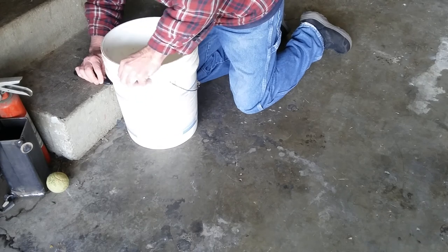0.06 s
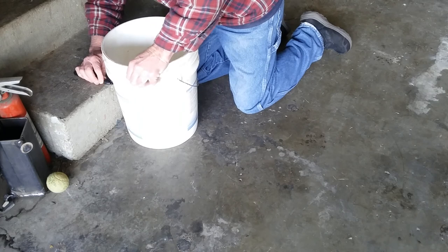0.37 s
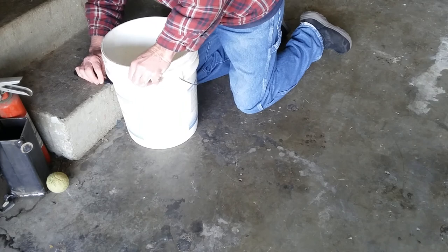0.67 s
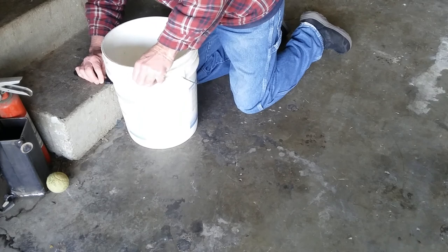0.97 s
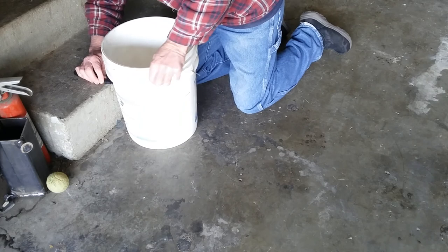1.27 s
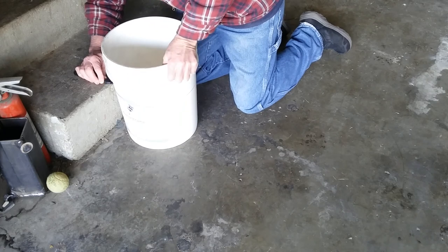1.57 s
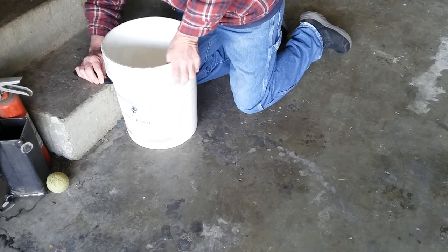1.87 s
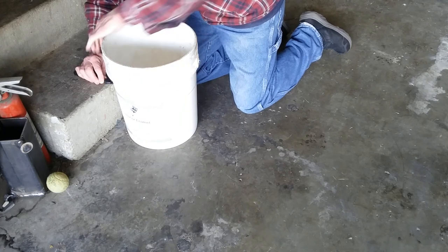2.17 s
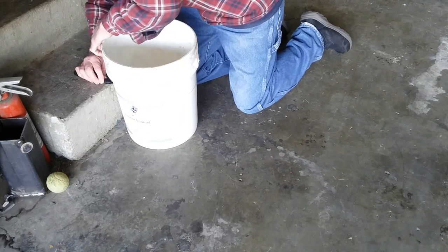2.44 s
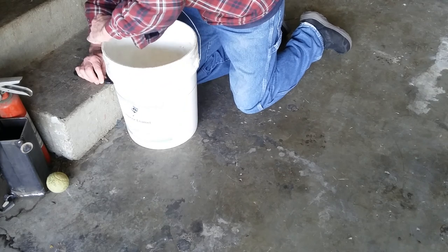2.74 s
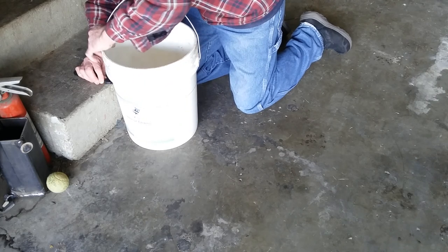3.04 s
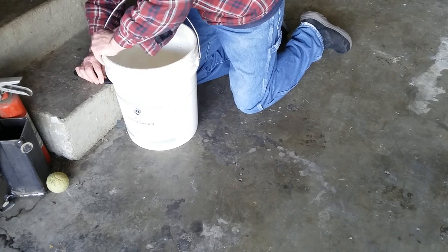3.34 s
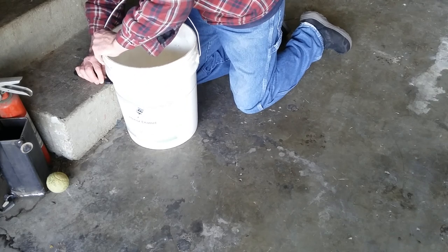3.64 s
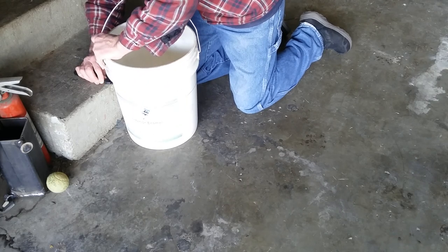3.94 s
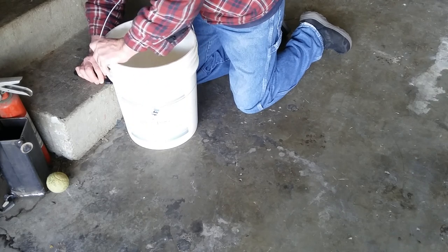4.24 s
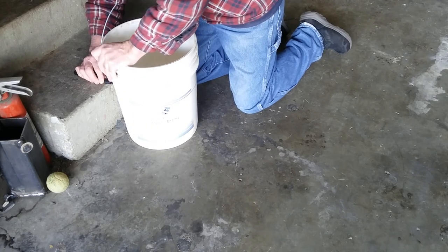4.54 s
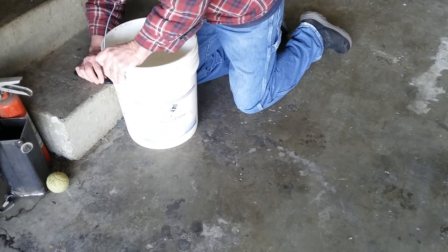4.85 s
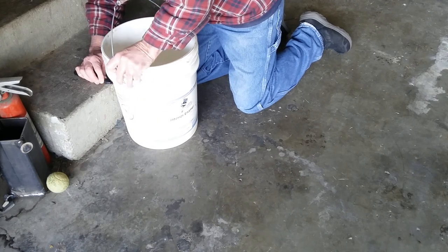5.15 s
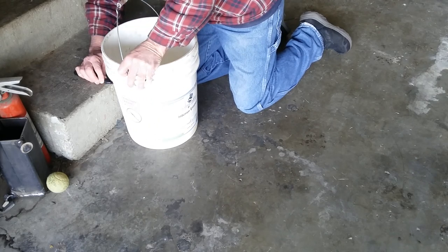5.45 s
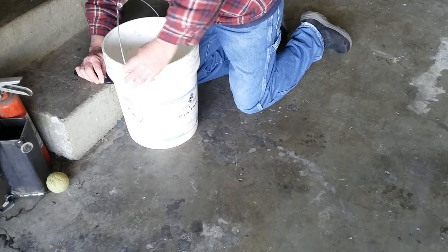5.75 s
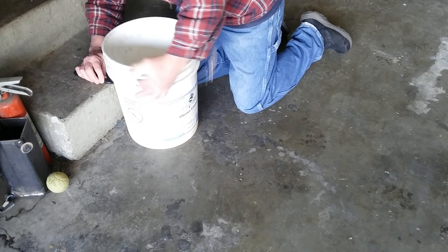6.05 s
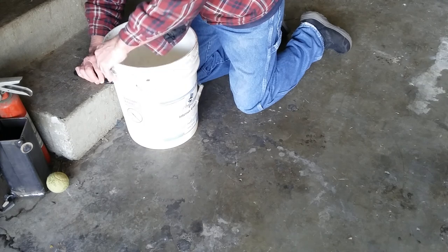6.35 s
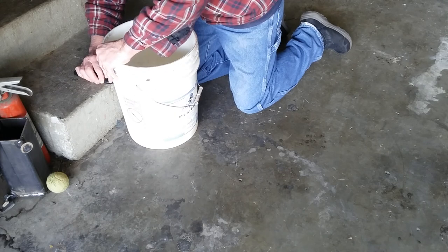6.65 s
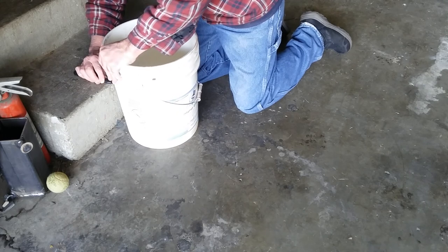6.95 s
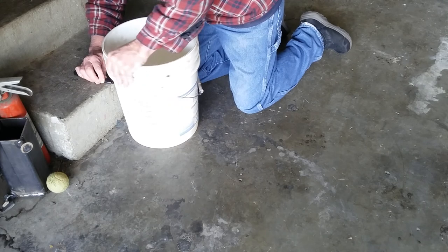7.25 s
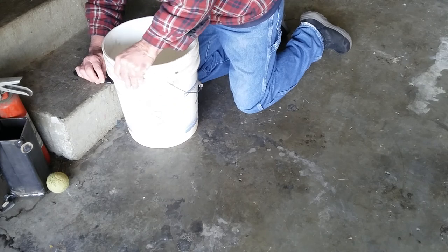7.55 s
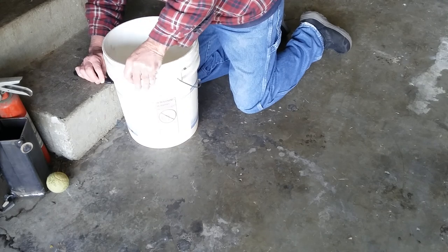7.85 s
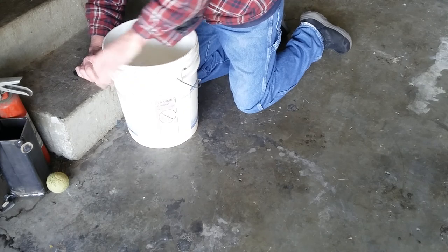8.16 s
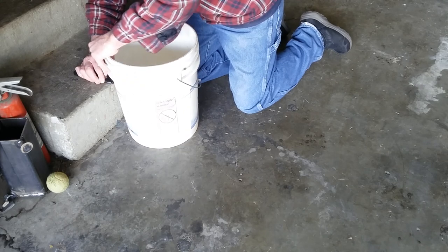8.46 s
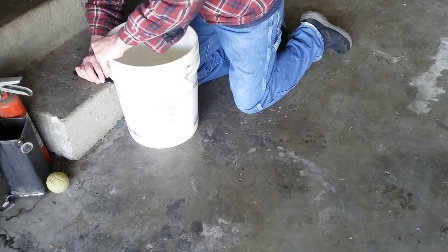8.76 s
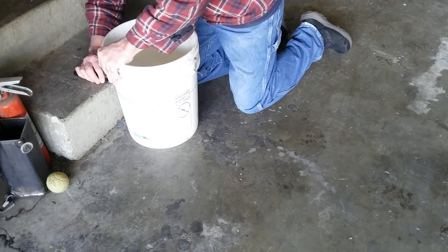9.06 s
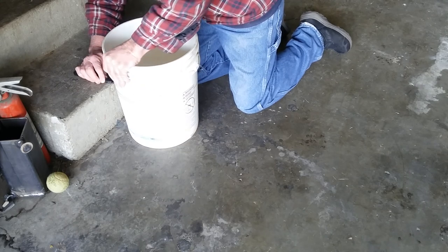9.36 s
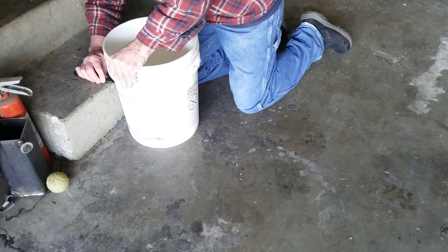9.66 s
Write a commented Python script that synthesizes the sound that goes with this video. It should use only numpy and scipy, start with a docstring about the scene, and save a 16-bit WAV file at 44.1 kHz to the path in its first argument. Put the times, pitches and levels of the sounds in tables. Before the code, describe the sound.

Hollow, rasping scrapes of a plastic bucket turned against a concrete step, interrupted by a loud, bouncing clatter of its wire handle.

```python
"""In a garage, a plastic bucket is turned by hand with its rim pressed against a concrete step.
First grit catches the rim in strokes, and the stick-slip friction rings the bucket's wall. From 2.3 s
the hand regrips: a sleeve brushes the rim and the wire handle clicks in its sockets. More strokes follow,
until at 6.2 s the handle swings over, slams on the wall and bounces. Then the scraping resumes, while
a far engine, droning faintly since the start, sinks in pitch."""
import sys
import numpy as np
from scipy import signal
from scipy.fft import rfft, irfft
from scipy.io import wavfile
from scipy.ndimage import uniform_filter1d

SR = 44100
rng = np.random.default_rng(int(sys.argv[2]) if len(sys.argv) > 2 else 0)


def transcribe(u):
    """Save the signal u as a 16-bit wav file named by the first command-line argument.

    u: samples, shape (n,) or (channels, n), limited to [-1, 1]; the rate is SR.
    q: integer samples, one column per channel.
    """
    v = np.clip(np.atleast_2d(u).T, -1, 1)
    q = np.round(v * 32767).astype(np.int16)
    wavfile.write(sys.argv[1], SR, q)


N = 433062
T = np.arange(N) / SR
RING_TIME = T[:SR * 3 // 4]
ROOM_T60_S = 0.5


def undb(db):
    """Decibels to amplitude ratio."""
    return 10 ** (np.asarray(db) / 20)


def unit(x):
    """Normalise to rms 1."""
    return x / np.sqrt(np.mean(x ** 2))


def unit_hit(x):
    """Normalise a blow so that its loudest 10 ms have rms 1."""
    return x / np.sqrt(uniform_filter1d(x ** 2, SR // 100).max())


def add(out, start_s, x):
    """Superposition: mix x into out from start_s on."""
    i = int(start_s * SR)
    out[i:i + len(x)] += x[:N - i]


def wander(hz):
    """Random modulation: glide between hz Gaussian values a second."""
    return np.interp(T * hz, np.arange(N // 100), rng.standard_normal(N // 100))


def colour(x, points, size=4096):
    """Minimum-phase filtering through (Hz, dB) points."""
    hz, db = np.transpose(points)
    gain = undb(np.interp(np.log(np.fft.rfftfreq(size, 1 / SR) + 1), np.log(hz), db))
    cepstrum = irfft(np.log(gain))
    cepstrum[1:size // 2] *= 2
    cepstrum[size // 2 + 1:] = 0
    return signal.fftconvolve(x, irfft(np.exp(rfft(cepstrum))))[:len(x)]


def split(x, low_hz=1090, high_hz=3870):
    """Crossover filtering into low, middle and high bands."""
    bands = (low_hz, "lowpass"), ([low_hz, high_hz], "bandpass"), (high_hz, "highpass")
    return [signal.sosfilt(signal.butter(4, hz, kind, fs=SR, output="sos"), x) for hz, kind in bands]


def decay(t60):
    """Exponential damping: 60 dB in t60 seconds."""
    return np.exp(-np.log(1000) * RING_TIME / t60)


def burst(t60):
    """Modal overlap: dense modes merge into decaying noise, here of unit energy."""
    x = rng.standard_normal(len(RING_TIME)) * decay(t60)
    return x / np.linalg.norm(x)


def modes(table, spread_db, detune=0.0013, build_cycles=0.89):
    """Modal superposition, unit energy: each contact favours other modes; low ones build up late."""
    hz, db, t60 = np.transpose(table)[:, :, None]
    amplitude = undb(db + spread_db * rng.standard_normal(hz.shape))
    cycles = hz * (1 + detune * rng.standard_normal(hz.shape)) * RING_TIME
    build = 1 - np.exp(-cycles / build_cycles)
    phase = 2 * np.pi * (cycles + rng.random(hz.shape))
    x = np.sum(amplitude * build * decay(t60) * np.sin(phase), axis=0)
    return x / np.linalg.norm(x)


# The far engine's note. Each row: time in seconds, pitch in Hz, level in dB.
ENGINE_NOTE = [(0, 97.6, -61.5), (.8, 94.6, -63.5), (2.2, 100, -71), (3.6, 98.4, -89), (4.4, 92, -61),
               (5.5, 89, -65.5), (6.2, 84, -51), (7.1, 81.4, -59.5), (7.599, 78.3, -58), (8, 66.8, -72),
               (9.8, 61.5, -70)]
def engine(waver_db=2):
    """Periodic firing gives a low tone that wavers in level."""
    times, hz, db = np.transpose(ENGINE_NOTE)
    phase = 2 * np.pi * np.cumsum(np.interp(T, times, hz)) / SR
    return unit(np.sin(phase)) * undb(np.interp(T, times, db) + waver_db * wander(12))


# Spectrum of the garage's still air. Each row: frequency in Hz, relative level in dB.
AIR_SPECTRUM = [(25, -31), (55, -6), (90, -3), (130, -7), (190, -5.5), (250, -18), (480, -17), (1200, -19),
                (2500, -27.5), (5500, -44), (10000, -41), (15500, -36.5)]
def air(level_db=-62):
    """Stationary noise, strongest in the bass, forms the ambient floor."""
    return undb(level_db) * unit(colour(rng.standard_normal(N), AIR_SPECTRUM))


# A sleeve's brush along the rim. Each row: time in seconds, level in dB.
SLEEVE_ENVELOPE = [(2.29, -100), (2.32, -66), (2.35, -63), (2.39, -70), (2.44, -83)]
# Spectrum of cloth on plastic. Each row: frequency in Hz, relative level in dB.
CLOTH_SPECTRUM = [(500, -29.5), (3000, -5.5), (5500, -9.5), (6600, 1), (8000, -5.5), (10500, -9.5),
                  (15000, -8.5)]
def sleeve(flutter_db=2.0):
    """Friction noise: fine threads slide over the plastic in a smooth swish."""
    times, db = np.transpose(SLEEVE_ENVELOPE)
    swish = unit(colour(rng.standard_normal(N), CLOTH_SPECTRUM))
    return swish * undb(np.interp(T, times, db) + flutter_db * wander(60))


# The wall flexes under hand and falling grip. Each row: start in seconds, relative level in dB.
WALL_THUMPS = [(0.503, -40), (0.84, -48), (1.436, -30), (3.101, -39), (3.149, -38.5), (5.958, -28),
               (5.977, -25), (6.074, -31), (6.463, -23)]
# Spectrum of a soft flex. Each row: frequency in Hz, relative level in dB.
FLEX_SPECTRUM = [(50, -33), (100, -4), (160, 4), (215, -2.5), (290, -1.5), (480, -9.5), (750, -24),
                 (2000, -53), (8000, -82)]
def thumps(push_t60=0.11, room_db=-4, gain_db=-7):
    """A soft contact lasts long, so it excites only the wall's low modes."""
    out = np.zeros(N)
    for start, db in WALL_THUMPS:
        push, room = (unit(colour(burst(t60), FLEX_SPECTRUM)) for t60 in (push_t60, ROOM_T60_S))
        add(out, start, undb(db + gain_db) * unit_hit(push + undb(room_db) * room))
    return out


# The bucket's modes. Each row: frequency in Hz, relative level in dB, 60 dB decay time in seconds.
BUCKET_MODES = [(122.1, -15.5, 0.84), (177.4, -8, 0.21), (250.5, -0.5, 0.28), (378, -6.5, .25),
                (495.8, -1, 0.22), (542, -8, 0.14), (648.5, -3, 0.29), (762, -0.5, 0.29), (949, -7.5, .31),
                (980, -7.5, .3), (1055, -6, 0.39), (1145, -9.5, 0.26), (1243, 0.5, 0.29), (1279, 1, 0.22),
                (1414, -19, 0.16), (1580, -3, 0.47), (1715, -12.5, .25), (1833, -8, 0.5),
                (1883, -9.5, 0.12), (2020, -11.5, 0.32), (2230, -17, 0.31), (2495, -5.5, 0.28),
                (2670, -14, .36), (3410, -12.5, 0.36), (3910, -16, .26), (4240, -18.5, 0.28)]
def bucket_ring(spread_db):
    """Impulse response: the bucket vibrates freely after one contact."""
    return modes(BUCKET_MODES, spread_db)


# The wall's drum note. Its row: frequency in Hz, relative level in dB, 60 dB decay time in seconds.
DRUM_MODE = [(500.5, 0, 0.13)]
def wall_drum(body_db):
    """Excitation at an antinode: a square blow drums the middle of the wall."""
    return undb(-3 + 0.78 * body_db) * unit(modes(DRUM_MODE, spread_db=0))


# The handle's modes. Each row: frequency in Hz, relative level in dB, 60 dB decay time in seconds.
WIRE_MODES = [(1473, -5, 0.076), (1710, -5, .24), (2330, -10, 0.13), (2980, -22, 0.25), (3960, -27, .25),
              (4720, -13.5, .14), (5320, -19, 0.12), (6560, -17.5, 0.22), (11700, -25.5, .15)]
def wire_ping(body_db):
    """Energy partition: the more of a blow goes into the wall, the less the wire rings."""
    ping = modes(WIRE_MODES, spread_db=1.5, detune=0.015)  # it sits differently in its sockets each time
    return undb(-16 - 0.8 * body_db) * unit(ping)


# Handle and rim strike bucket and step. Each row: start in seconds, clack level in dB,
# hollow body and sharp tick in dB relative to the clack, after-ring gain in dB.
BLOWS = [(0.1385, -51.5, -8, -6, -7), (1.763, -40, -10, -17.5, 2), (1.963, -55.5, -3.5, -16, -2.5),
         (2.4231, -48, 0.5, -28, -4), (2.455, -49.5, -11, -20, 7), (2.599, -50.5, -4, -28, -6),
         (2.6381, -49, -2, -24, 7), (2.7065, -51, -4, -32, -5), (2.7142, -34, -11.5, -17.5, 1.5),
         (2.746, -44.5, -27, -27, 4), (2.9171, -46, -17, -10.5, 7), (2.94, -48, -22, -16, 8),
         (2.9699, -41.5, -8, -13.5, 0), (3.0221, -35.5, -14.5, -13, 1), (3.4862, -64.5, 7, -22, 10),
         (3.5623, -62.5, 5, -8, 2), (3.7715, -54, 8.5, -20, -5), (5.841, -47, -11, -12, -3),
         (6.1009, -38.5, -9.5, -24, -1), (6.1095, -47, -3, -15, -2), (6.158, -40.5, -12, -15, -3),
         (6.2072, -15.5, 2.5, -14.5, 0), (6.2324, -14, -16, -20, 2.5), (6.4348, -19.5, -7, -10, -0.5),
         (6.4489, -28.5, -2.5, -12, 15), (6.556, -34.5, 1.5, -19, 13), (6.5629, -35.5, -10, 1, -15),
         (6.572, -22, -11.5, -8, -4.5), (6.6421, -26, -7.5, -9.5, -9.5), (8.794, -56, -3, -23, 1),
         (9.433, -53, -4, -12, -12)]
# Spectrum of the dense, short-lived wall modes. Each row: frequency in Hz, relative level in dB.
CLACK_SPECTRUM = [(50, -47), (190, -21.5), (270, -1.5), (430, -8), (520, 2), (680, -14.5), (900, -8.5),
                  (1250, -1.5), (1800, -5), (2550, -10), (3200, -17.5), (4600, -16), (8300, -25.5),
                  (15000, -36.5)]
# Spectrum of the hard contact. Each row: frequency in Hz, relative level in dB.
TICK_SPECTRUM = [(2000, 0), (4500, 2), (6000, 1), (8300, -1.5), (11000, -6), (15000, -11)]
def knocks(crack_t60=0.06, tick_t60=0.018, tail_t60=0.4, sheen_t60=0.37):
    """Impact excitation: each blow cracks, rings bucket and wire, and dies away in the room."""
    out = np.zeros(N)
    for start, db, body_db, tick_db, after_db in BLOWS:
        crack, tail, sheen = (unit(colour(burst(t60), CLACK_SPECTRUM))
                              for t60 in (crack_t60, tail_t60, sheen_t60))
        ping = wire_ping(body_db)
        ring = undb(-1) * unit(bucket_ring(spread_db=4.0))
        blow = undb(-5) * crack + wall_drum(body_db) + undb(after_db) * (tail + ring + ping)
        body, clack, _ = split(blow)
        # the treble leaves the plastic within milliseconds; a duller sheen stays in the room
        _, _, snap = split(colour(burst(tick_t60), TICK_SPECTRUM))
        _, _, glow = split(sheen + ping)
        tick = undb(-3) * unit(snap) + undb(after_db) * unit(glow)
        knock = unit_hit(clack) + undb(body_db) * unit_hit(body) + undb(tick_db) * unit_hit(tick)
        add(out, start, undb(db) * knock)
    return out


def grit(per_second=3000, scatter_db=1.5, judder_db=2.5, judder_hz=54.95):
    """Stick-slip friction: sand grains catch and release the rim in clusters."""
    catches = (rng.random(N) < per_second / SR) * rng.standard_normal(N)
    sizes = undb(scatter_db * np.minimum(rng.exponential(size=N), 4))
    return catches * sizes * undb(judder_db * wander(judder_hz))


def stroke(start, rise, hold, load_db_per_s=73, sag_db_per_s=21.5, stop_db_per_s=135,
           creep_db_per_s=42.5):
    """Gain follows sliding speed: the contact creeps under load, speeds up, eases, stops and creeps on."""
    loading = undb(-19 - load_db_per_s * np.maximum(start - T, 0))
    speed = loading + (1 - loading) * np.clip((T - start) / rise, 0, 1) ** 1.38
    held_s = np.clip(T - start - rise, 0, hold)
    after_s = np.maximum(T - start - rise - hold, 0)
    stop_db = np.maximum(-stop_db_per_s * after_s, -16.5 - creep_db_per_s * after_s)
    return speed * undb(stop_db - sag_db_per_s * held_s)


# Pushes turn the rim against the step. Each row: start, rise and hold in seconds, rasp level in dB,
# wall rumble and grit hiss in dB relative to the rasp.
TURNING_PUSHES = [(-.05, 0.03, 0.44, -46, 0, -19.5), (0.327, 0.18, .02, -50.5, -0.5, -22.5),
                  (1.042, .11, 0.045, -41.5, 2, -22), (1.19, 0.044, 0.14, -50, 2, -18.5),
                  (1.32, .12, 0.15, -41, -2.5, -19.5), (1.672, 0.074, 0.015, -44, 0, -22),
                  (3.067, 0.064, 0.016, -47, -3, -22), (3.193, 0.024, .01, -53.5, -0.5, -16.5),
                  (3.542, 0.057, 0.016, -51, -1, -33), (3.747, 0.084, .26, -51.5, 3.5, -23.5),
                  (4.031, 0.18, 0.024, -50, 5, -25.5), (4.223, 0.074, 0.33, -41.5, 3, -23.5),
                  (4.582, 0.13, 0.11, -50.5, 4, -22.5), (4.886, 0.18, 0.061, -38.5, 0, -22.5),
                  (5.236, .2, .04, -43.5, 2.5, -25.5), (6.888, .08, 0.11, -48.5, 6, -23),
                  (7.126, 0.15, 0.12, -42.5, 3, -23), (7.44, 0.19, .11, -46.5, -0.5, -21.5),
                  (7.767, 0.079, 0.058, -43.5, 0.5, -23.5), (8.455, 0.1, 0.038, -61, 5, -25),
                  (8.763, 0.089, .04, -42.5, 3.5, -25), (8.888, .08, 0.27, -49, 4, -19.5),
                  (9.273, 0.14, 0.13, -48.5, 1.5, -22.5), (9.605, 0.15, 0.12, -48, -3, -26)]
# Hand and handle rub the bucket in regripping. Each row: start, rise and hold in seconds, level in dB.
LIGHT_RUBS = [(2.301, 0.032, 0.036, -52), (2.422, 0.054, .08, -50), (2.927, .07, 0.13, -48),
              (5.799, .11, 0.071, -45.5), (6.043, 0.038, .06, -46.5), (8.447, 0.035, .02, -61.5)]
def sliding_gains(rub_rumble_db=-20.5, rub_hiss_db=-25.5):
    """Incoherent sources add in power: pushes and rubs sum to the gains of rumble, rasp and hiss."""
    rubs = [(*rub, rub_rumble_db, rub_hiss_db) for rub in LIGHT_RUBS]  # these hardly move the wall
    power = np.zeros((3, N))
    for start, rise, hold, db, rumble_db, hiss_db in TURNING_PUSHES + rubs:
        band_gains = undb([db + rumble_db, db, db + hiss_db])
        power += np.outer(band_gains, stroke(start, rise, hold)) ** 2
    return np.sqrt(power)


# Spectrum of the scraping rim. Each row: frequency in Hz, relative level in dB.
RIM_SPECTRUM = [(40, -34), (80, -14.5), (130, 3.5), (200, -4), (275, 1.5), (350, -8.5), (450, -3.5),
                (780, -15.5), (1050, -7), (1550, -11), (2400, -23.5), (4300, -34.5), (6500, -36),
                (15000, -48.5)]
def scrape(room_db=-1, ring_db=-9, roam_db=6.0, ring_top_hz=1400):
    """Forced vibration: grit drives the rim and the wall's modes into rumble, rasp and hiss."""
    force = grit()
    reverberant = force + undb(room_db) * signal.fftconvolve(force, burst(ROOM_T60_S))[:N]
    ring = np.zeros(N)
    for _ in range(4):  # the contact roams round the rim, so the mix of modes keeps changing
        weight = undb(roam_db * wander(3.6))
        ring += weight * signal.fftconvolve(force, bucket_ring(spread_db=1.5))[:N]
    # soft plastic on stone barely reaches the high modes
    ring = signal.sosfilt(signal.butter(2, ring_top_hz, fs=SR, output="sos"), ring)
    sound = unit(colour(reverberant, RIM_SPECTRUM)) + undb(ring_db) * unit(ring)
    bands = split(sound, low_hz=370, high_hz=3320)
    return sum(gain * unit(band) for gain, band in zip(sliding_gains(), bands))


def scene():
    """Linear superposition of all sources at one point."""
    return (scrape() + sleeve() + knocks() + thumps() + engine() + air())[None]


def record(dry, ceiling=0.7, bottom_hz=40, top_hz=15800):
    """Soft saturation rounds the loudest peaks; band limiting cuts the deep bass and the top."""
    rounded = ceiling * np.tanh(dry / ceiling)
    lean = signal.sosfilt(signal.butter(2, bottom_hz, "highpass", fs=SR, output="sos"), rounded)
    return signal.sosfilt(signal.ellip(10, .2, 80, top_hz, fs=SR, output="sos"), lean)


dry = scene()
out = record(dry)
transcribe(out)
```